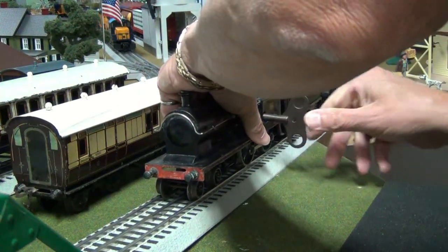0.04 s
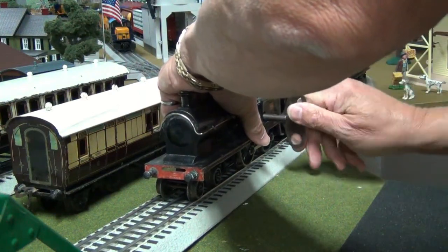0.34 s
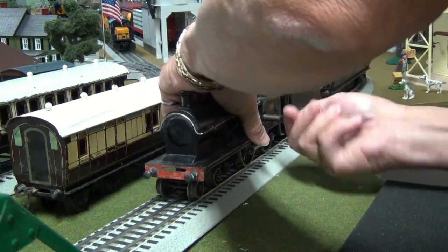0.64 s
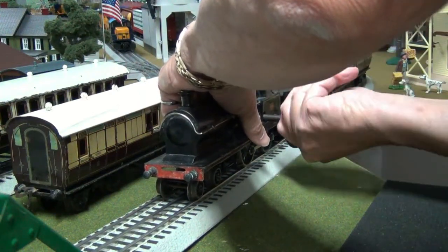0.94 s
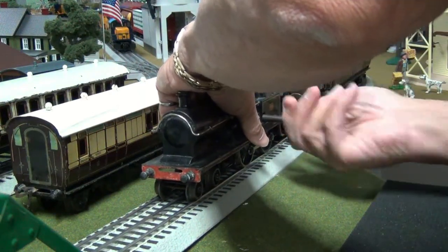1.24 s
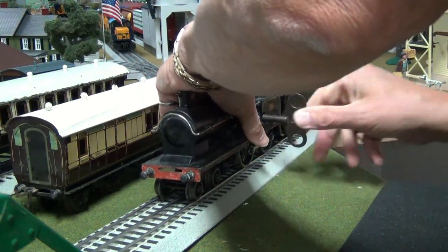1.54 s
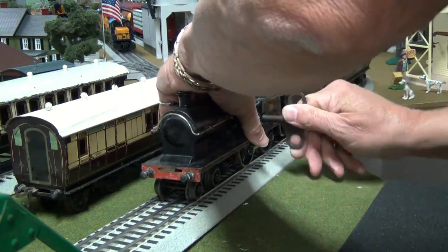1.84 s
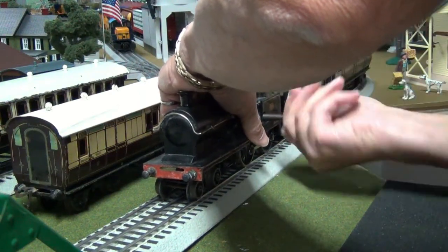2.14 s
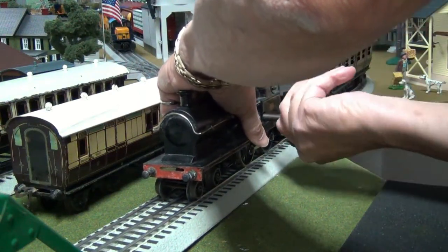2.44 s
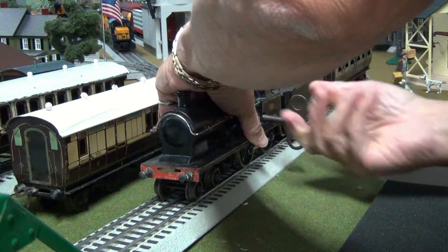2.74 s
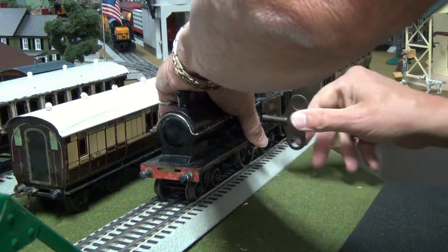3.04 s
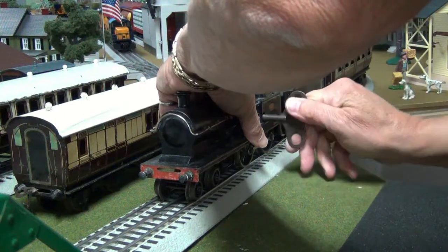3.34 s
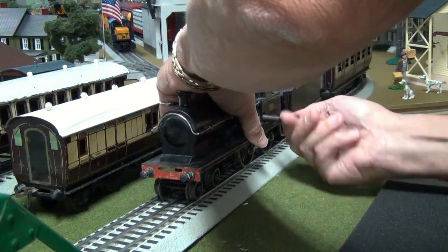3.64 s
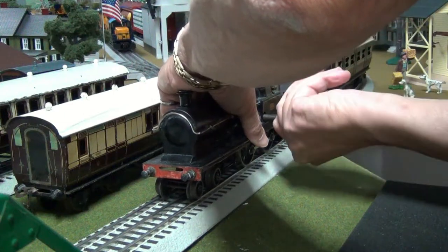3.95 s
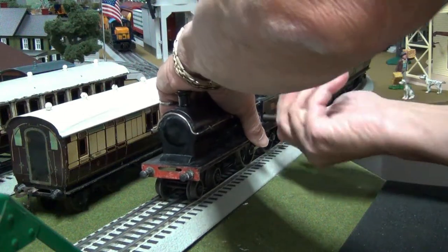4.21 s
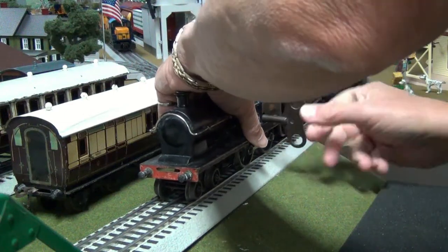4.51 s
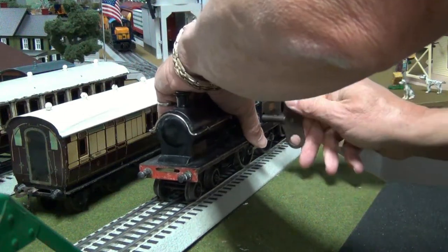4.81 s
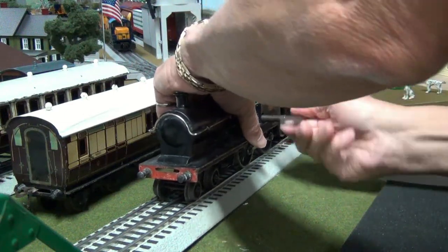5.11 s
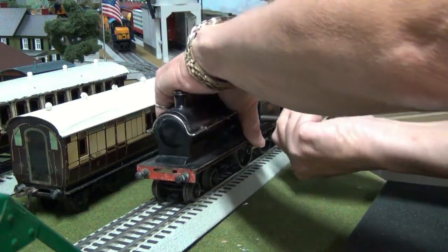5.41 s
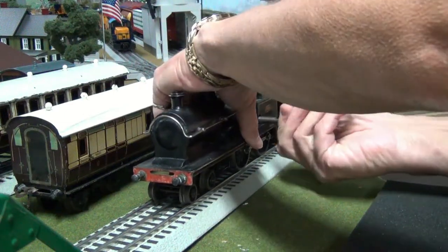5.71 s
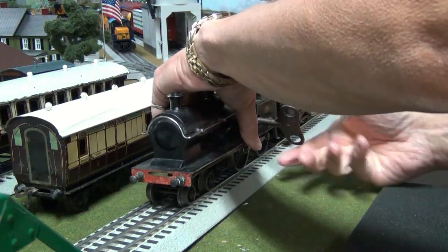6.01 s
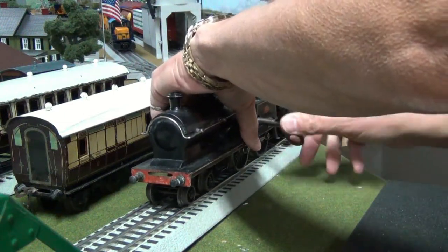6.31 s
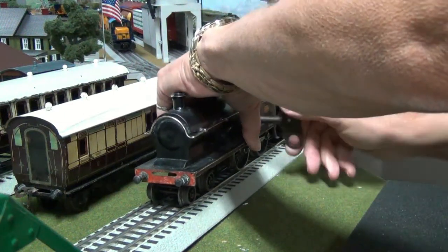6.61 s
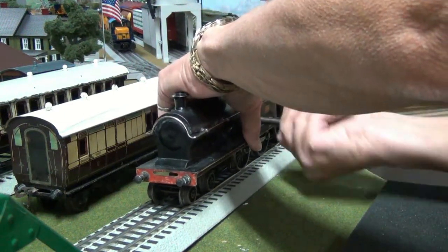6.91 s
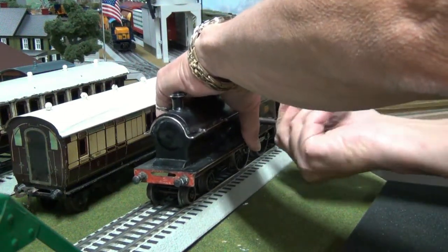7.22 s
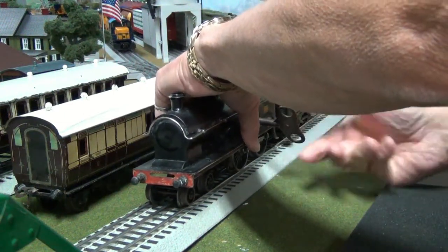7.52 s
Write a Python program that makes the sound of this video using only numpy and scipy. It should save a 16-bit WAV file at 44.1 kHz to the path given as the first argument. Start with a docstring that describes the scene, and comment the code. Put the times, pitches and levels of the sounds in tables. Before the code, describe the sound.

A key winds a clockwork toy locomotive in five evenly paced half turns. Each turn gives a quick run of four or five sharp, bright ratchet clicks with a brief tinny ring. Between turns the loose key ticks and rattles on its shaft, the engine knocks lightly on the track and fingers brush faintly. It is heard close up in a small, lively room with a faint hiss.

```python
"""Winding a clockwork toy locomotive.

Five half turns of the key, close by in a small, lively room. In each turn the pawl snaps over four
or five ratchet teeth, ringing the steel works and the tin body. Around the turns the key rattles on
its shaft, the held engine rocks on the baseboard and the fingers brush as they take a new grip.
Still air and a faint electronic whistle lie underneath."""
import sys
import numpy as np
from scipy import signal
from scipy.fft import rfft, irfft, next_fast_len
from scipy.io import wavfile
from scipy.ndimage import uniform_filter1d

SR = 44100
rng = np.random.default_rng(int(sys.argv[2]) if len(sys.argv) > 2 else 0)


def file_out(sig):
    """Save sig as 16-bit WAV at sys.argv[1]."""
    # one column per channel
    cols = np.atleast_2d(sig).T
    # limit, then scale
    lim = np.clip(cols, -1, 1)
    pcm = np.round(lim * 32767).astype(np.int16)
    wavfile.write(sys.argv[1], SR, pcm)


N = 337806

# Pawl drops. Each row: start in seconds, then relative dB of the snap, its lower part and the tin body.
PAWL_DROPS = [(0.5565, 5, 2, -13.5), (0.641, 4.5, 1.5, -6.5), (0.6977, 5.5, 3.5, -15),
              (0.7599, 5.5, -2.5, -13), (0.8502, 5.5, -6, -17), (2.024, 6, -3, -10),
              (2.095, 3.5, -7, -15.5), (2.1438, 5, -2, 0.5), (2.2, 5, 2, -3.5), (2.296, 3, 0.5, -8.5),
              (3.5732, 6.5, 2.5, -14), (3.6497, 4, 1.5, -6.5), (3.7196, 4.5, -3, -17), (3.8, 5.5, 0.5, -13),
              (3.8894, 6, -10, -14.5), (5.1098, 5.5, -7.5, -6.5), (5.1727, 3, -1.5, -10),
              (5.2298, 4.5, 0.5, -4.5), (5.305, 4.5, 2, -6), (6.7278, 4, 0.5, -7.5), (6.8, 4.5, 1, -17),
              (6.8651, 5, 1.5, -4.5), (6.9148, 6, 2.5, -7.5), (6.9673, 6, 1, -12)]
# Engine jolts on the rails. Each row: start in seconds, then relative dB of knock, key tick, board boom.
ENGINE_JOLTS = [(0.363, -22.5, -29, -36), (1.0872, -11, -11, -20), (1.66, -42, -50, -32),
                (1.7428, -30, -36, -27), (1.9149, -11.5, -13.5, -24), (2.294, -11, -24, -14.5),
                (2.6597, -19, -27, -25), (3.4217, -12, -25, -22), (4.0835, -11, -14.5, -19.5),
                (4.905, -35, -45, -21.5), (5.537, -11, -26, -14), (5.5679, -5.5, -10, -19),
                (5.6114, -18, -16, -22), (5.723, -18.5, -12.5, -24), (5.8083, -17, -19, -23),
                (6.2769, -31, -45, -33), (6.5317, -9, -45, -22), (7.232, -15, -17, -15),
                (7.2588, -14.5, -12.5, -19)]
# Chassis knock spectrum. Each row: frequency in Hz, level in dB.
KNOCK_SPECTRUM = [(40, -27), (130, -8), (280, -2), (450, -2), (750, 3.5), (1150, 1), (2000, -26),
                  (6000, -38)]


def ratchet():
    """The pawl snaps onto the next tooth and chatters, ringing the steel works and the tin body."""
    # Snap spectra. Each row: frequency in Hz, level in dB.
    high_spectrum = [(400, -31.5), (4000, -18.5), (7000, -11.5), (8600, 3), (10000, 0), (13500, -2),
                     (15500, -0.5), (17000, -22)]
    low_spectrum = [(100, -40), (500, -24), (1200, -24), (2400, -18), (3300, -12.5), (4200, -2), (5100, 6),
                    (6800, -3.5), (9500, -34)]
    # Modes. Each row: frequency in Hz, level in dB, t60 in seconds.
    steel_modes = [(4470, -34, .025), (4990, -3, 0.025), (5730, -5, .03), (6700, -16, 0.015),
                   (8134, -3, 0.018), (9150, 3.5, 0.019), (10530, -4.5, 0.028), (12800, 4, 0.0054),
                   (14640, -8, 0.013)]
    tin_modes = [(1263, -9.5, 0.023), (1480, 2.5, 0.053), (1539, 3.5, 0.042), (1640, -1.5, 0.019),
                 (1678, -5, 0.074), (1880, -24, 0.038)]
    high, low, knock = causal(high_spectrum), causal(low_spectrum), causal(KNOCK_SPECTRUM)
    chatter_s = 0.0007
    out = np.zeros(N)
    for s, snap_db, low_db, tin_db in PAWL_DROPS:
        add(out, s, amp(snap_db - 1) * burst(high, chatter_s, t60_s=0.019, rise_s=0.000097))
        add(out, s, amp(low_db - 1.5) * burst(low, chatter_s, t60_s=0.017, rise_s=0.00017))
        add(out, s, amp(snap_db - 6) * ring(steel_modes, spread_db=5, detune=0.0019, size=2048))
        add(out, s, amp(tin_db) * ring(tin_modes, spread_db=2, detune=0.011, size=2048))
        add(out, s, amp(-22 + 0.86 * tin_db) * burst(knock, hold_s=0.0015, t60_s=0.05))
    return out


def key(blows):
    """The loose key ticks, the tin shell clacks, the chassis knocks; a few loose parts and the steel works ring
    on."""
    # Steel tick and tin clack spectra. Each row: frequency in Hz, level in dB.
    tick_spectrum = [(1000, -20), (3200, 3), (4300, -1.5), (5000, 5.5), (7000, 0.5), (8500, 3.5),
                     (10000, 4.5), (12000, -0.5), (16000, -8)]
    clack_spectrum = [(300, -19.5), (800, -10), (1100, -7.5), (1600, 2.5), (2200, -6.5), (3200, -3.5),
                      (4500, -12), (9000, -41.5)]
    # Loose parts; the rows at 1.088 s and 4.085 s are the steel works ringing. Each row: start in seconds,
    # frequency in Hz, energy in dB, t60 in seconds.
    clinks = [(.469, 1200, -13.5, 0.046), (0.55, 1160, -29, 0.05), (1.088, 4980, -9.5, .02),
              (4.085, 5400, -14, 0.018), (5.724, 7620, -16, 0.14)]
    tick, clack, knock = causal(tick_spectrum), causal(clack_spectrum), causal(KNOCK_SPECTRUM)
    out = np.zeros(N)
    for s, tick_db, clack_db, knock_db in blows:
        add(out, s, amp(tick_db + 0.55) * burst(tick, hold_s=0.0019, t60_s=0.016, rise_s=0.0006))
        add(out, s, amp(clack_db - 0.1) * burst(clack, hold_s=0.0006, t60_s=0.035, rise_s=0.00032))
        add(out, s, amp(knock_db - 1.4) * burst(knock, hold_s=0.0029, t60_s=0.027))
    for s, hz, db, t60_s in clinks:
        add(out, s, amp(db) * ring([(hz, 0, t60_s)], spread_db=0, detune=0, size=8192))
    return out


def key_blows():
    """Clicks, grips, rattles and jolts. Each row: start in seconds, tick, clack and knock in dB."""
    # Key on its shaft; the rows at 2.1965 s and 5.3009 s are the pawl lifting just before a snap. Each row:
    # start in seconds, then relative dB of steel tick and tin clack.
    single_clicks = [(0.2492, -32, -28.5), (0.3997, -44, -26.5), (0.5297, -30, -40), (0.9943, -17.5, -15.5),
                     (1.0745, -7, -19), (1.2387, -31, -44), (1.8926, -22.5, -30), (1.998, -14, -22),
                     (2.1965, -19, -10.5), (2.3872, -24, -13), (2.3932, -8.5, -18), (2.4652, -9.5, -16.5),
                     (2.6802, -29, -19), (2.7696, -25, -35), (2.824, -27.5, -48), (3.3704, -28.5, -33),
                     (3.515, -15, -21), (3.9665, -14.5, -11.5), (4.0553, -8, -20), (4.313, -25, -32),
                     (4.7994, -30, -25), (5.0512, -23, -18.5), (5.3009, -23, -11.5), (5.4575, -10, -13),
                     (5.5254, -11, -15), (5.8271, -36, -22), (5.978, -27.5, -31), (6.6597, -12.5, -16.5),
                     (7.1435, -14, -14), (7.2132, -7, -14), (7.2275, -18, -4.5), (7.2718, -19, -25),
                     (7.341, -24.5, -32)]
    # Half turns. Each row: grip in seconds, release in seconds, loosening rattle in relative dB.
    half_turns = [(0.4685, 1.08, -26.5), (1.927, 2.465, -28), (3.4507, 4.067, -26.5), (4.9795, 5.564, -17),
                  (6.5913, 7.273, -16.5)]
    grip_tick_db, grip_clack_db, settle_db, rattle_s = -3.5, -8, -26, 0.085
    clicks = list(single_clicks)
    for grip_s, release_s, loosen_db in half_turns:
        clicks.append((grip_s, grip_tick_db, grip_clack_db))
        clicks.extend(rattle(grip_s, rattle_s, settle_db))  # until the spring takes the load
        clicks.extend(rattle(release_s - rattle_s, rattle_s, loosen_db))
    light = [(s, tick_db, clack_db, -17.5 + 0.74 * clack_db) for s, tick_db, clack_db in clicks]
    jolts = [(s, tick_db, knock_db - 0.5, knock_db) for s, knock_db, tick_db, _ in ENGINE_JOLTS]
    return light + jolts


def rattle(start_s, length_s, db, rate_hz=70, spread_db=3):
    """The loose key ticks unevenly. Each row: start in seconds, tick and clack in dB."""
    jitter, tick_scatter, clack_scatter = rng.standard_normal((12, 3)).T
    age_s = (np.arange(len(jitter)) + 0.5 + 0.3 * jitter) / rate_hz
    tick_db = db + spread_db * tick_scatter
    clack_db = db - 4.5 + spread_db * clack_scatter
    return np.transpose([start_s + age_s, tick_db, clack_db])[age_s < length_s]


def baseboard():
    """At each jolt the wheels rub softly on the rails and the board booms."""
    # Wheel rub. Each row: frequency in Hz, level in dB.
    rail_spectrum = [(60, -20), (200, -6), (330, 0), (520, 0), (800, -4), (1150, -7), (2000, -24)]
    # Each row: frequency in Hz, level in dB, t60 in seconds.
    board_modes = [(62, -7, 0.17), (90, -7.5, .22), (122.6, -5, 0.31), (134, -3, 0.39), (173, -5, 0.15),
                   (237.6, -2, 0.22), (307, -6.5, 0.11), (424, 1, 0.38), (497, -6.5, 0.16)]
    lag_s, rub_s = 0.014, 0.083
    rubs = [(s + lag_s, rub_s, -50 + 0.27 * knock_db) for s, knock_db, *_ in ENGINE_JOLTS]
    out = strokes(rubs) * noise(rail_spectrum)
    for s, *_, boom_db in ENGINE_JOLTS:
        add(out, s, amp(boom_db) * ring(board_modes, spread_db=3, detune=0.0068, size=8192))
    return out


def fingers(grain_db=3):
    """Skin slides in short strokes; on the key it catches in tiny slips."""
    # Each row: middle in seconds, length in seconds, relative level in dB, share on the key (0-1).
    slides = [(.5, 0.026, -60, 0.7), (4.472, 0.092, -44, 0.14), (5.646, 0.058, -32.5, 0.74),
              (6.088, 0.11, -49, 0.06), (6.48, 0.061, -55.5, 0.2), (7.55, 0.084, -40.5, 0.25)]
    # Skin on skin, skin on the key. Each row: frequency in Hz, level in dB.
    skin_spectrum = [(200, -25), (900, 1), (1800, 0), (3800, 1.5), (6500, -12), (10500, 5), (13000, -2),
                     (16000, -7)]
    scrape_spectrum = [(200, -22), (900, -4), (1700, -2.5), (4500, -4), (7000, -6), (10000, -4),
                       (16000, -18)]
    rubs = np.array(slides)
    slips = unit(uniform_filter1d(rng.standard_normal(N), size=60)) * np.sqrt(N)
    key_share = np.interp(np.arange(N) / SR, rubs[:, 0], rubs[:, 3])
    brush = np.sqrt(1 - key_share) * noise(skin_spectrum)
    scrape = np.sqrt(key_share) * noise(scrape_spectrum) * amp(grain_db * slips)
    return amp(-2.5) * strokes(rubs[:, :3]) * (brush + scrape)


def radiated_snaps(pause_s=0.5):
    """Summed over all directions the snap has a smooth spectrum: this fills the room."""
    # Each row: frequency in Hz, level in dB.
    radiated_spectrum = [(200, -21), (700, -11.5), (1500, -10), (2300, -12), (3400, -7), (4200, -3.5),
                         (4950, 3.5), (7700, 4), (9000, 4.5), (10000, 3.5), (12000, 2.5), (15500, -2.5)]
    pulse = unit(causal(radiated_spectrum))
    gaps_s = np.diff([row[0] for row in PAWL_DROPS], prepend=-np.inf)
    out = np.zeros(N)
    for (s, snap_db, *_), gap_s in zip(PAWL_DROPS, gaps_s):
        send_db = -6.5 if gap_s > pause_s else -2.5  # a turn's first snap echoes less
        add(out, s, amp(snap_db + send_db) * pulse)
    return out


def room(x, count=3, switch_hz=14):
    """The moving arms keep changing the echo paths, so a few responses take turns."""
    active = np.arange(N) * switch_hz // SR % count
    out = np.zeros(N)
    for k in range(count):
        share = uniform_filter1d(1.0 * (active == k), size=200)
        out += signal.oaconvolve(x * np.sqrt(abs(share)), echoes())[:N]
    return out


def echoes(first_s=0.0073, build_s=0.023, size=13230):
    """Room response: reflections arrive after a gap, build, and die by band."""
    # Each row: frequency in Hz, t60 in seconds.
    decay_times = [(150, 0.45), (600, 0.31), (1500, 0.25), (3000, .27), (5000, .26), (9000, 0.23),
                   (15000, 0.2)]
    # Each row: frequency in Hz, gain in dB.
    echo_gains = [(150, 0.5), (700, 1), (1500, 2), (3000, 1), (6500, -2.5), (9000, -2.5), (12000, -1.5),
                  (15500, -7.5)]
    hz, t, bands = signal.stft(rng.standard_normal(size), SR, nperseg=256)
    decay = amp(-60 * t / read(decay_times, hz)[:, None])
    tail = signal.istft(bands * decay, SR, nperseg=256)[1][:size]
    age_s = np.arange(size) / SR - first_s
    onset = (age_s > 0) * (1 - 0.29 * np.exp(-abs(age_s) / build_s))
    return signal.oaconvolve(unit(tail * onset), causal(echo_gains))[:size]


def air(rms_db):
    """Still air of the room: steady noise."""
    # Each row: frequency in Hz, relative density in dB.
    air_spectrum = [(13, -41), (22, -14), (59, -7.5), (90, -2.5), (184, -7.5), (223, -5.5), (328, -8.5),
                    (356, -5.5), (690, -10), (861, -8), (1710, -15.5), (1910, -15), (2390, -17),
                    (9220, -20.5), (16000, -18.5)]
    return amp(rms_db) * noise(air_spectrum)


def whistle(hz=15733, peak_db=-74):
    """Faint steady tone of electronics."""
    return amp(peak_db) * np.sin(2 * np.pi * hz * np.arange(N) / SR)


def burst(response, hold_s, t60_s, rise_s=0.00027, size=2048):
    """A blow on crowded modes: contact builds and chatters, then the sound dies fast."""
    t = np.arange(size) / SR
    envelope = (1 - np.exp(-t / rise_s)) * amp(-60 * np.maximum(t - hold_s, 0) / t60_s)
    chatter = np.sign(rng.standard_normal(size))
    return unit(signal.fftconvolve(chatter * envelope, response)[:size])


def ring(modes, spread_db, detune, size):
    """Dying modes; each blow lands a little differently and shares its energy anew."""
    hz, db, t60_s = np.transpose(modes)[:, :, None]
    t = np.arange(size) / SR
    share, shift, polarity = rng.standard_normal((3, len(modes), 1))
    gains = np.sign(polarity) * amp(db + spread_db * share)
    tones = np.sin(2 * np.pi * hz * (1 + detune * shift) * t)
    return unit(np.sum(gains * amp(-60 * t / t60_s) * tones, axis=0))


def strokes(rows):
    """Envelope of strokes that swell and fade."""
    out = np.zeros(N)
    for middle_s, length_s, db in rows:
        add(out, middle_s - length_s / 2, amp(db) * signal.windows.cosine(round(length_s * SR) + 1))
    return out


def noise(spectrum):
    """Steady coloured noise, rms one."""
    return unit(shape(rng.standard_normal(N), spectrum)) * np.sqrt(N)


def shape(x, spectrum):
    """Zero-phase filter over a whole track."""
    size = next_fast_len(N, True)
    gain = amp(read(spectrum, np.fft.rfftfreq(size, 1 / SR)))
    return irfft(rfft(x, size) * gain, size)[:N]


def causal(spectrum, size=2048):
    """Minimum-phase impulse response of a spectrum."""
    hz = abs(np.fft.fftfreq(size, 1 / SR))
    log_gain = np.log(amp(read(spectrum, hz)))
    return np.fft.ifft(np.exp(np.conj(signal.hilbert(log_gain)))).real


def read(points, hz):
    """Interpolates a table over log frequency."""
    points_hz, values = np.transpose(points)
    return np.interp(np.log(hz + 1), np.log(points_hz), values)


def add(mix, start_s, sound):
    """Adds a sound into the mix."""
    part = mix[max(round(start_s * SR), 0):][:len(sound)]
    part += sound[:len(part)]


def amp(db):
    """Decibels to gain."""
    return 10 ** (np.asarray(db) / 20)


def unit(x):
    """Scales to energy one."""
    return x / np.sqrt(np.sum(x ** 2) + 1e-20)


def scene():
    """Near sounds, echoes and still air, mixed as mid and side into left and right."""
    # Stereo image. Each row: frequency in Hz, gain into the side signal in dB.
    room_width = [(60, -28), (300, -13.5), (1500, -9.5), (2800, -11.5), (5000, -10), (9000, -11.5),
                  (10500, -22), (15000, -28)]
    shell_spread = [(500, -28), (1600, -27), (3500, -17), (6000, -16), (9000, -15.5), (14000, -15)]
    right_lean = [(1000, -53), (3000, -28), (6000, -24), (10000, -20), (14000, -16)]
    blows = key_blows()
    snaps = ratchet()
    handling = key(blows) + fingers() + baseboard()
    near = snaps + handling
    room_send = radiated_snaps() + amp(-7.5) * snaps + amp(-10) * handling
    mid = near + room(room_send) + air(rms_db=-57) + whistle()
    side = shape(room(room_send) + air(rms_db=-51.5), room_width)
    # The same blows leave the shell's far faces with another fine pattern.
    side += shape(ratchet() + key(blows), shell_spread)
    side -= shape(near, right_lean)
    return np.array([mid + side, mid - side])


def record(dry, cutoff_hz=16100):
    """Steep low-pass on both channels."""
    lowpass = signal.firwin(255, cutoff_hz, window=("kaiser", 8), fs=SR)
    return signal.oaconvolve(dry, lowpass[None], "same", axes=1)


dry = scene()
out = record(dry)
file_out(out)
```